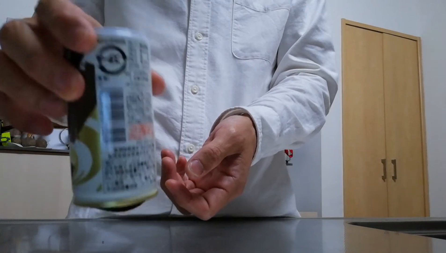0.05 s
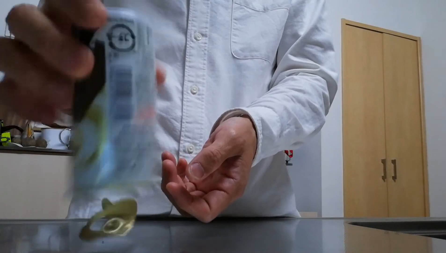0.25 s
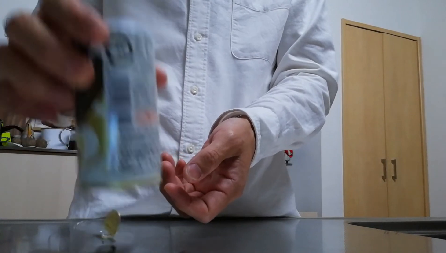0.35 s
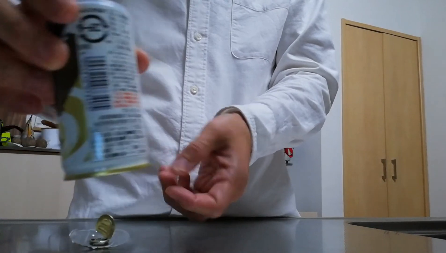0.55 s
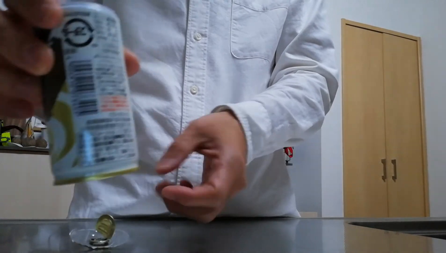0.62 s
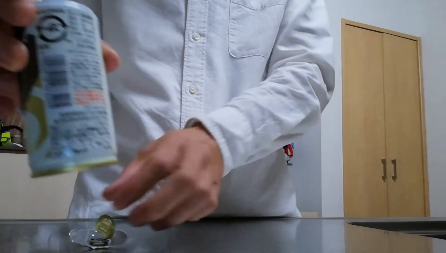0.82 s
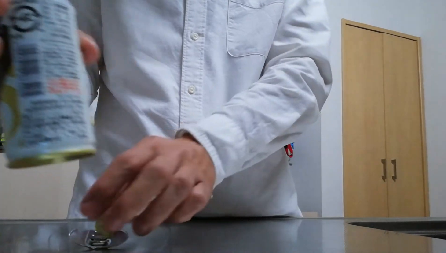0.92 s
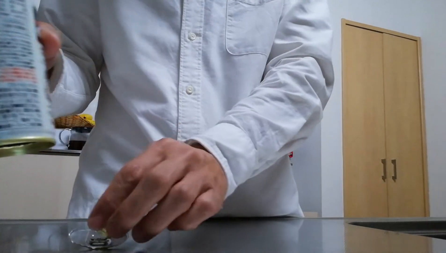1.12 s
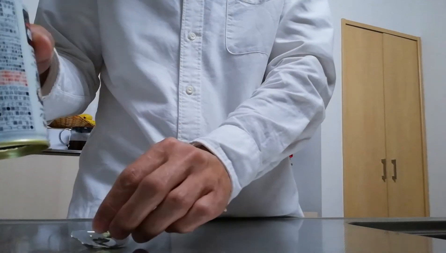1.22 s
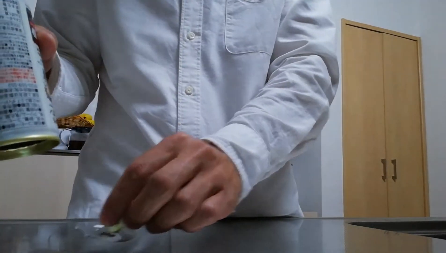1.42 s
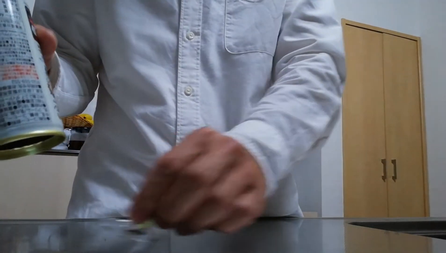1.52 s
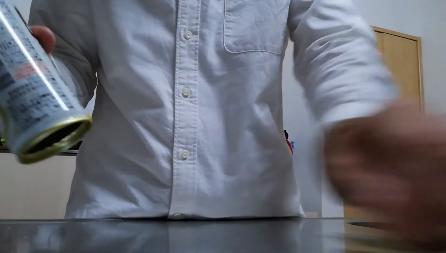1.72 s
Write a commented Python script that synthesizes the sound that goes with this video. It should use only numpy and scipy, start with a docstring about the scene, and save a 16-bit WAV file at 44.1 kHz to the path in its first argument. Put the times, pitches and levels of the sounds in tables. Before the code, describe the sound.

A thin can lid bounces on a hard tabletop with quick, high metallic rings and settles on its rim. Light scraping in the can comes before, a short skid after, over low air noise in a small, live room.

```python
"""A cut-out can lid bounces on a hard table with a bright metal ring and rattles to rest on its rim.
Each contact is a crack plus the lid's modes, coloured by where the rim lands. Before the fall, the
lid's edge scrapes and taps down inside its resonant can; afterwards, fingers slide it off the table.
A small, live room with ventilation noise surrounds it, and gain control ducks under the clatter."""
import sys
import numpy as np
from scipy import signal
from scipy.fft import rfft, irfft, next_fast_len
from scipy.io import wavfile

SR = 44100
rng = np.random.default_rng(int(sys.argv[2]) if len(sys.argv) > 2 else 0)


def to_wav(s):
    """Save 16-bit WAV."""
    ch = np.atleast_2d(s).T  # columns
    pcm = np.round(np.clip(ch, -1, 1) * 32767)  # PCM
    wavfile.write(sys.argv[1], SR, pcm.astype(np.int16))


N = 77175

# The lid's hits on the table: (time [s], level [dB], low-mode trim [dB], favoured low mode [Hz],
# its boost [dB], favoured high band [Hz], its boost [dB], crack [dB], left minus right [dB],
# attack [s], share of the free ring time [ratio])
BOUNCES = [(0.217, -17, 1.5, 4286, 10.5, 11600, 11.5, -13, 2.5, .0015, 0.4),
           (.2517, -16.5, 2.5, 2332, 15, 12300, 5.5, -6, 3.5, .0006, 1),
           (.3, -27, -1.5, 3537, 1.5, 10284, 9, -13, -7.5, .0004, .5),
           (.3645, -24, -3.5, 3537, 1, 6100, 17.5, -25.5, -1.5, .0005, 0.2),
           (.3785, -22.5, -10, 3921, 12, 13160, 7, -9, 5.5, .0005, 1),
           (.398, -19, 1, 3417, 4.5, 10284, 12, -18.5, 1, .003, 0.23),
           (.402, -16, -2.5, 5058, 7.5, 8137, -3.5, -18, 3.5, .001, 0.71),
           (0.429, -24.5, -5.5, 3537, 19, 11885, 12.5, -26, 7, .006, 0.74),
           (.4703, -17, -13.5, 3690, 9, 14712, 11, -10, 4, .0004, 0.53),
           (.4748, -19, -2.5, 3417, 17, 8200, 13.5, -21.5, 2, .0008, 0.74),
           (.504, -21, -12, 4286, 10.5, 11885, 13.5, -27, 2.5, .003, 0.84),
           (.5305, -14.5, -13.5, 3417, 15.5, 11300, 16, -17, 7.5, .001, 0.47),
           (.597, -27, -13, 4286, 4, 10500, 9, -36, 4, .0008, 0.8),
           (.6135, -26.5, -5, 3417, -3, 11885, 9.5, -27, -2, .00086, 0.44)]
# The free lid's modes, three lists in step: (pitch [Hz]), (level [dB]), (t60 [s])
LID_HZ = [705, 1361, 1955, 2332, 2600, 3417, 3537, 3690, 3921, 4286, 5058, 5932, 6130, 6305, 6576, 6930,
          7720, 7875, 8137, 8508, 8700, 9155, 9902, 10284, 11003, 11885, 12008, 12345, 12824, 13160, 14320,
          14712, 15080]
LID_DB = [-29, -24.5, -25, -20.5, -19, -4.5, 0.5, -7, -15, -5, -8.5, -10.5, -15, -3.5, -14.5, -12, -5, -1,
          2, -6, -3, -1, -6, 2.5, 5, 4, -4.5, -3.5, -12, -8.5, -12, -14.5, -16.5]
LID_T60 = [.2, .28, .3, 0.086, 0.16, 0.17, 0.15, .08, .34, 0.19, .26, .25, .06, .12, .4, .2, .06, 0.074,
           0.17, .22, .25, 0.082, 0.16, 0.22, 0.1, .13, .1, .18, .14, 0.12, .12, .15, .15]

HIT_REVERB_DB, RUB_REVERB_DB = -6, -5.5
SPLASH_T60_S = .08  # the dense, short ring after a contact


def amp(db):
    """Decibels to amplitude."""
    return 10 ** (np.asarray(db) / 20)


def unit(x):
    """x scaled to rms 1."""
    return x / np.sqrt(np.mean(abs(x) ** 2) + 1e-20)


def along(points, hz):
    """Read a curve of (Hz, value) points on a log frequency axis."""
    f, v = np.transpose(points)
    return np.interp(np.log(hz + 1), np.log(f + 1), v)


def filtered(x, response):
    """x times a complex response of frequency."""
    m = next_fast_len(x.shape[-1] + SR // 4)
    return irfft(rfft(x, m) * response(np.fft.rfftfreq(m, 1 / SR)), m)[..., :x.shape[-1]]


def resonance(hz, centre, width):
    """Band-pass response of one damped mode."""
    return 1j * hz * width / (centre * centre - hz * hz + 1j * hz * width)


def body(x, colour, peaks=()):
    """x through a broad EQ curve with resonances on top, at unit power gain."""
    ring = lambda hz: 1 + sum(amp(db) * resonance(hz, centre, width) for centre, width, db in peaks)
    return filtered(x, lambda hz: unit(amp(along(colour, hz)) * ring(hz)))


def add(track, s, sound):
    """Mix a sound in at s seconds."""
    part = track[..., max(round(s * SR), 0):][..., :sound.shape[-1]]
    part += sound[..., :part.shape[-1]]


def burst(s, rise, t60):
    """An envelope that rises at s seconds and dies away."""
    t = np.maximum(np.arange(N) / SR - s, 0)
    return np.minimum(t / rise, 1) * amp(-60 * np.maximum(t - rise, 0) / t60)


def pan(db):
    """Stereo gains with the left side db above the right."""
    return amp(np.array([[.5], [-.5]]) * db)


def low_modes():
    """True for the lid's broad bending modes, false for the higher ones."""
    return np.array(LID_HZ) < 5500


def friction(grain_db, grains_per_s=700):
    """Gritty stick-slip noise of rms 1."""
    grains = rng.standard_normal(N)
    roughness = np.interp(np.arange(N) / SR * grains_per_s, np.arange(N), grains)
    return unit(rng.standard_normal((2, N)) * amp(grain_db * roughness))


def in_room(x, wet_db):
    """A stereo sound plus the small room's diffuse tail, which hangs longest in the bass."""
    # Reverb time: (frequency [Hz], t60 [s])
    decay = [(300, 0.96), (3000, 0.33), (8000, 0.3), (12000, 0.28), (15000, 0.11)]
    hz, t, spectrum = signal.stft(rng.standard_normal((2, SR // 2)), SR, nperseg=256)
    tail = signal.istft(spectrum * amp(-60 * t / along(decay, hz)[:, None]), SR, nperseg=256)[1]
    tail *= 1 - np.exp(-(np.arange(tail.shape[1]) / SR / .0016) ** 2)  # reflections build up
    wet = signal.fftconvolve(x, tail / np.linalg.norm(tail[0]), axes=1)[:, :x.shape[1]]
    return x + amp(wet_db) * wet


def ventilation():
    """A steady bed of air noise, nearly mono in the bass."""
    # Tone of the air: (frequency [Hz], relative level [dB])
    colour = [(20, -27), (48, -5.5), (212, -5.5), (236, -7), (384, -5.5), (463, -9.5), (531, -5),
              (1040, -3), (1440, -12.5), (1940, -10), (2350, -23.5), (3430, -20.5), (6050, -29),
              (11600, -28.5), (14800, -46), (16000, -57)]
    # Droning resonances: (centre [Hz], width [Hz], boost [dB])
    drones = [(61.8, 10, 0.5), (188, 5.6, 6), (241.6, 5.2, 5.5), (535.5, 25, 5.5)]
    # Stereo image: (frequency [Hz], left-right correlation [-1 to 1])
    likeness = [(60, 1), (150, .92), (260, 0.91), (500, -0.2), (1000, -0.18), (4000, 0)]
    spread = lambda hz: np.arccos(np.clip(along(likeness, hz), -1, 1)) / 2
    noise = body(rng.standard_normal((2, N)), colour, drones)
    mid, side = filtered(noise, lambda hz: np.array([np.cos(spread(hz)), np.sin(spread(hz))]))
    return amp(-44.5) * unit(np.array([mid + side, mid - side]))


def finger_slide():
    """Damped by the fingers, the lid skids briefly on the table."""
    # The held lid's resonances: (centre [Hz], width [Hz], boost [dB])
    held_modes = [(3020, 50, 19), (3380, 60, 18), (3900, 70, 14), (5330, 70, 14), (6400, 300, 16),
                  (7870, 160, 19), (8500, 260, 15), (9800, 320, 13), (10420, 90, 15), (11420, 300, 15),
                  (12010, 50, 18), (13600, 140, 20)]
    # Tone of the skid: (frequency [Hz], relative level [dB])
    colour = [(200, -39), (2000, -18.5), (3500, -12), (4900, -13), (8500, 1.5), (12000, 5.5), (13000, -6.5),
              (15500, -11)]
    # Finger pushes: (time [s], level [dB], attack [s], t60 [s])
    pushes = [(1.2232, -32, 0.0099, 0.2), (1.231, -23.5, 0.0022, 0.026), (1.2421, -24, 0.0014, 0.025),
              (1.359, -45.5, .011, 0.08)]
    push = sum(amp(db) * burst(s, rise, t60) for s, db, rise, t60 in pushes)
    return in_room(body(push * friction(grain_db=1), colour, held_modes), RUB_REVERB_DB)


def can_scrape():
    """The lid's cut edge rubs and taps along the can's wall on the way out."""
    # The can's resonances: (centre [Hz], width [Hz], boost [dB])
    can_modes = [(664, 51, 23.5), (1266, 100, 17.5), (2170, 100, 5.5), (2343, 74, 17), (4370, 70, 14.5),
                 (6100, 90, 10), (7050, 50, 13.5), (7930, 60, 0.5), (8520, 70, 3.5)]
    # Tone of the can: (frequency [Hz], relative level [dB])
    colour = [(100, -29.5), (500, -4.5), (1500, -0.5), (4000, 8), (5400, 2.5), (7000, 6), (12000, 8),
              (14000, -7.5), (16000, -3.5)]
    # Rubbing envelope: (time [s], level [dB])
    rubbing = [(0, -29.5), (0.013, -37), (0.033, -28.5), (0.043, -33.5), (0.054, -34), (0.082, -28.5),
               (.095, -66), (.21, -96)]
    # Taps on the wall: (time [s], level [dB])
    wall_taps = [(0.0198, -39), (0.0454, -36), (0.1342, -39.5), (0.1787, -45.5)]
    rub = amp(np.interp(np.arange(N) / SR, *np.transpose(rubbing))) * friction(grain_db=-1)
    tap_envelope = sum(amp(db) * burst(s, rise=1 / SR, t60=.026) for s, db in wall_taps)
    taps = filtered(tap_envelope * rng.standard_normal((2, N)), lambda hz: 2 / (1 + 1j * hz / 7600))
    return in_room(body(rub + taps, colour, can_modes), RUB_REVERB_DB)


def flex():
    """The first landing bends the whole lid, which sings on."""
    # Bending tones: (pitch [Hz], level [dB], swell [s], t60 [s], left minus right [dB])
    bends = [(705, -34, .004, .16, -4), (3921, -16.5, .014, .21, 7)]
    t = np.arange(N) / SR
    out = np.zeros((2, N))
    for hz, db, swell, t60, pan_db in bends:
        tone = np.sin(2 * np.pi * (hz * t + rng.random()))
        out += amp(db) * pan(pan_db) * burst(BOUNCES[0][0], swell, t60) * tone
    return out


def rim_rattle():
    """The lid wobbles on its rim; light contacts come ever faster and blur into a ringing rattle."""
    # The rim rolling on the table: (time [s], force [dB])
    roll = [(.5, -23), (.549, -14.5), (.575, -16.5), (.63, -18.5), (.648, -29), (.675, -36), (.715, -66)]
    # Tone of the rim's grit: (frequency [Hz], relative level [dB])
    sizzle = [(1500, -31.5), (3600, -12.5), (4700, -28.5), (6300, 4.5), (11900, 6), (15000, -7)]
    first_contacts_per_s, speedup_s = 160, .13
    wobble_hz, wobble_db = 58, 4  # the rim presses harder once a turn
    ring_share, low_db, grit_db = .28, -7.5, -10
    t = np.arange(N) / SR
    s, db = np.transpose(roll)
    rate = first_contacts_per_s * np.exp((np.clip(t, s[0], s[-1]) - s[0]) / speedup_s)
    contacts = np.diff(np.floor(np.cumsum(rate * rng.exponential(1, N)) / SR), prepend=0)
    force = contacts * np.sqrt(SR / rate) * amp(np.interp(t, s, db, left=-120, right=-120))
    force *= amp(wobble_db * np.sin(2 * np.pi * wobble_hz * t))
    widths = np.log(1000) / (np.pi * np.array(LID_T60) * ring_share)
    polarity = rng.choice([-1, 1], (2, len(LID_HZ)))
    gains = amp(np.array(LID_DB) + low_db * low_modes()) / widths * polarity
    modes = lambda hz: np.array([resonance(hz, centre, width) for centre, width in zip(LID_HZ, widths)])
    tone = filtered(force, lambda hz: unit(gains @ modes(hz)))
    n = SR // 20
    scuff = unit(rng.standard_normal((2, n)) * amp(-60 * t[:n] / SPLASH_T60_S)) / np.sqrt(n)
    grit = body(signal.fftconvolve(force[None], scuff, axes=1)[:, :N], sizzle)
    return in_room(tone + amp(grit_db) * grit, HIT_REVERB_DB)


def bounce(s, db, low_db, low_hz, low_boost_db, high_hz, high_boost_db, crack_db, pan_db, rise, share):
    """One hit on the table: a crack, then modes weighted by where the rim lands, choked by later hits."""
    # Tone of the crack: (frequency [Hz], relative level [dB])
    crack_colour = [(100, -41.5), (700, -36.5), (1600, -17), (3300, -9), (4750, -11.5), (6200, -2),
                    (7200, -2.5), (8000, -3), (12000, 1), (13700, -5.5), (15500, -2)]
    # Stereo place of each lid mode: (left minus right [dB])
    mode_pan = [-5, -8.5, -12, 15.5, 10.5, 7.5, -2, 0, 9, 1, -5.5, -13, -1.5, -9, -6.5, 5, -1, 10.5, -4,
                -2.5, -1, 8, 5.5, -5.5, -9.5, -4.5, -2, 7.5, 8, 4.5, -2.5, -1.5, 0.5]
    high_width_hz, scatter_db = 440, 3
    detune_hz = 7.3  # the table's touch shifts each mode a little
    low_swell_s = .008  # the favoured low mode swells as the others feed it
    choke_db, choke_s = .5, .025  # ring lost at every later hit
    crack_t60_s, splash_db = .025, -12
    t = np.arange(SR // 2) / SR
    hz = np.array(LID_HZ)
    low_favour = abs(hz - low_hz) == abs(hz - low_hz).min()
    high_favour = np.exp(-((hz - high_hz) / high_width_hz) ** 2)
    level = db + np.array(LID_DB) + low_db * low_modes() + scatter_db * rng.standard_normal(len(hz))
    level += low_boost_db * low_favour + high_boost_db * high_favour
    weights = amp(level) * pan(mode_pan) * np.exp(2j * np.pi * rng.random((2, len(hz))))
    pitch = hz + detune_hz * rng.standard_normal(len(hz))
    damping = np.log(1000) / (np.array(LID_T60) * share)
    modes = np.exp(np.outer(2j * np.pi * pitch - damping, t))
    swell = 1 - np.exp(-t / (rise + low_swell_s * low_favour)[:, None])
    later_hits = sum(np.clip((s + t - hit[0]) / choke_s, 0, 1) for hit in BOUNCES if hit[0] > s)
    tone = (weights @ (modes * swell)).real * amp(-choke_db * later_hits)
    fade = amp(-60 * t / crack_t60_s) + amp(splash_db - 60 * t / SPLASH_T60_S)
    noise = body(rng.standard_normal((2, len(t))), crack_colour)
    crack = amp(crack_db) * np.minimum(t / rise, 1) * fade * noise
    return in_room((tone + crack) * pan(pan_db), HIT_REVERB_DB)


def falling_lid():
    """The lid lands, bounces from edge to edge, then settles flat."""
    out = flex() + rim_rattle()
    for hit in BOUNCES:
        add(out, hit[0], bounce(*hit))
    return out


def scene():
    """Scrape, clatter and slide over the room's air."""
    return can_scrape() + falling_lid() + finger_slide() + ventilation()


def record(dry):
    """Gain control ducks loud passages, peaks are rounded off and a steep low-pass trims the top."""
    threshold_db, duck_db_per_db, response_s, top_hz = -24.5, .48, .052, 15300
    pole = np.exp(-1 / (response_s * SR))
    power = signal.lfilter([1 - pole], [1, -pole], np.mean(dry ** 2, axis=0))
    ducked = dry * (1 + power / amp(threshold_db) ** 2) ** (-duck_db_per_db / 2)
    rounded = ducked / (1 + (ducked / .9) ** 8) ** (1 / 8)
    return filtered(rounded, lambda hz: 1 / (1 + (hz / top_hz) ** 120))


dry = scene()
out = record(dry)
to_wav(out)
```